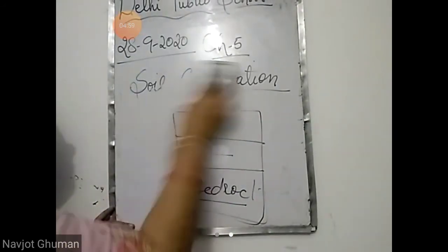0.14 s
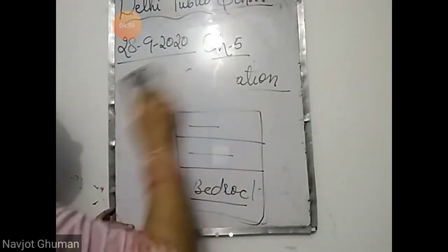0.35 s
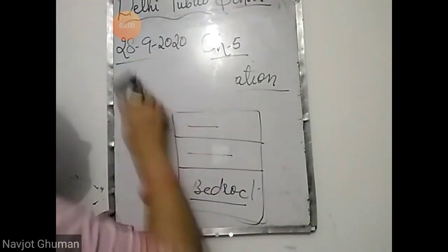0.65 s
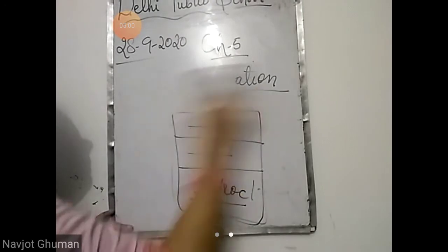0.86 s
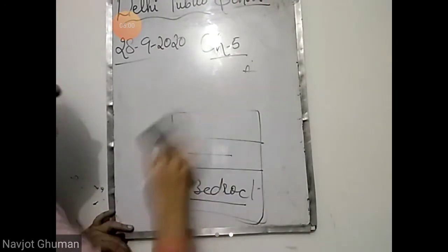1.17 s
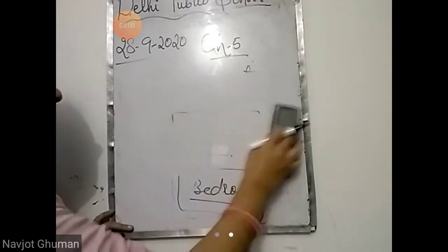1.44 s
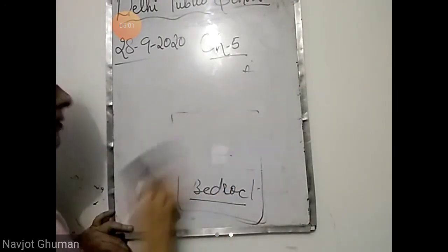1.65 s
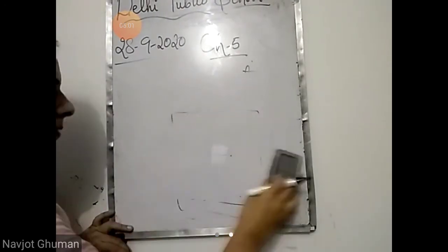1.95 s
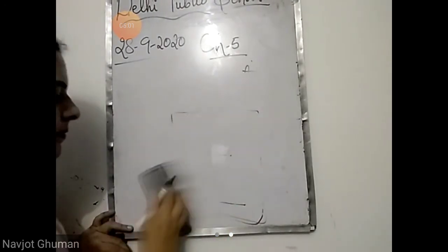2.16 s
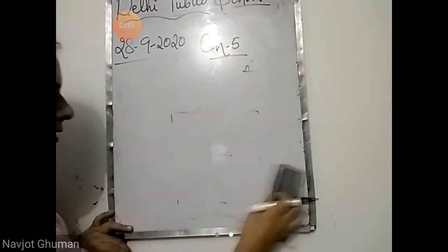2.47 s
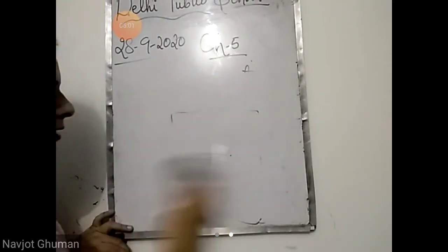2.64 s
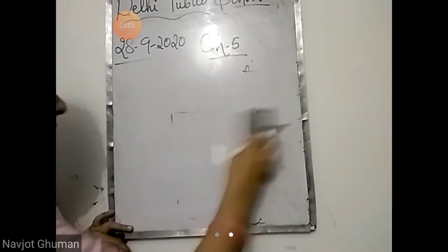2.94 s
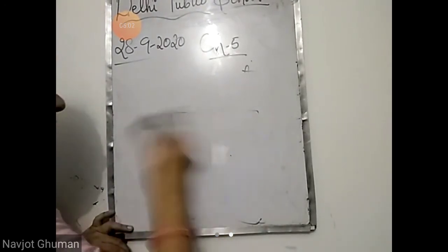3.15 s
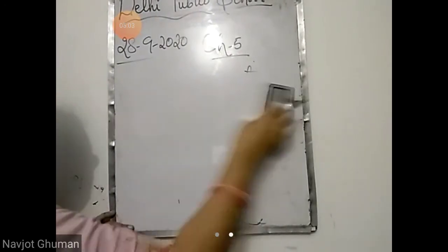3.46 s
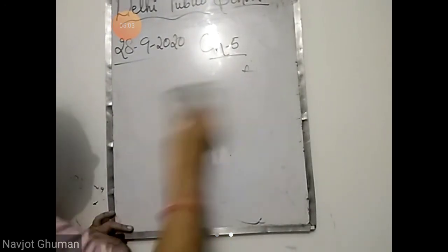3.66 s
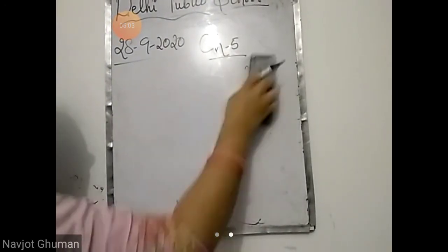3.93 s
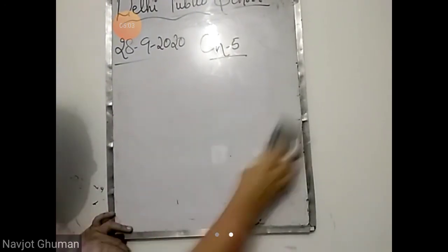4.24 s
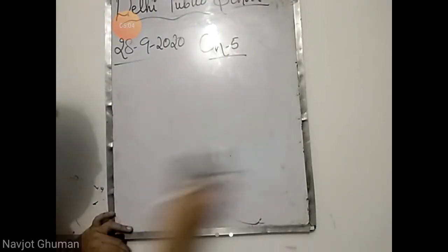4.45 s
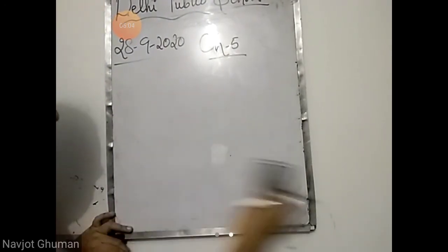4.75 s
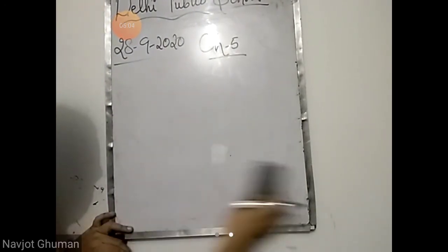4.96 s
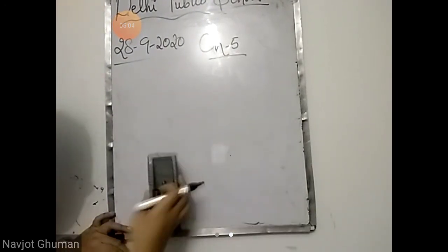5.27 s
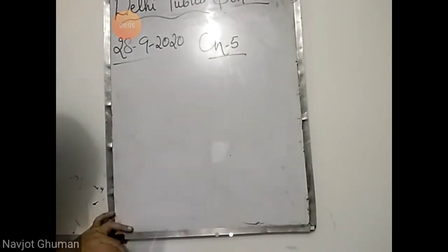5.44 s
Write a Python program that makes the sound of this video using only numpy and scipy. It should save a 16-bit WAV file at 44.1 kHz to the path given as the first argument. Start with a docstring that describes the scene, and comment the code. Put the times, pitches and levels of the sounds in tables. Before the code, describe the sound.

A felt duster with a plastic holder wipes a whiteboard in a small, quiet, fairly dead room, heard closely in mono over faint steady hiss. It opens mid-stroke with a raspy rub, quick low judders and a thin, faint squeak until about 0.5 s, where tiny bright ticks appear. A clear hollow knock lands at 0.65 s, then softer wipes follow around 1.0 and 1.2 s. From 1.5 s strokes come faster and scrape more coarsely, with clacks near 1.7 s. The strongest burst is at 2.15-2.35 s: sharp hiss, hard plastic clacks, hollow knocks and a dull board bump. More knocks and scrapes follow at 2.6 and 2.93 s. From 3.0 to 4.2 s it is sparse, with muted knocks and light rubs. Scratchy wipes return at 4.3 and 4.65 s, a fuller hissing stroke at 4.85-5.0 s, short rubs near 5.15 s, then near silence with one barely audible brush around 5.5 s.

```python
"""Felt hisses and rasps in strokes over a whiteboard, with knocks, judders and ticks, in a small quiet room.
Random fibre slips and a stuttering resonant scrape make the felt; its drag makes a low rumble and a hollow rub.
The pad's judders are short wavering tones. The plastic holder knocks in damped modes, chatters and clacks.
Small bright ticks, some very faint, are fast-decaying coloured noise; a thin squeak is a moving noise band."""
import sys
import numpy as np
from scipy import signal
from scipy.fft import rfft, irfft, next_fast_len
from scipy.io import wavfile
from scipy.ndimage import uniform_filter1d, map_coordinates

SR = 44100
rng = np.random.default_rng(int(sys.argv[2]) if len(sys.argv) > 2 else 0)


def digitize_waveform(pressure):
    """Quantize a signal to 16-bit integers and store it at the path in sys.argv[1].

    Rows of a 2-D input are taken as channels; values are limited to [-1, 1].
    """
    field = np.atleast_2d(pressure).T
    bounded = np.clip(field, -1, 1)
    quanta = np.round(bounded * 32767).astype(np.int16)
    wavfile.write(sys.argv[1], SR, quanta)


N = 246959

# Spectrum of the room tone. Each row: frequency in Hz, relative level in dB.
ROOM_TONE_SPECTRUM = [(25, -14), (60, -18), (150, -8), (330, -1), (700, -5), (1400, -10.5), (3000, -14),
                      (6000, -18), (9000, -21), (12000, -23.5), (16000, -30)]
# Decay of the room. Each row: frequency in Hz, t60 in seconds.
ROOM_DECAY = [(150, 0.29), (1000, 0.12), (4000, 0.067), (14000, 0.17)]
# Dull bumps of the board giving under the arm. Each row: time in seconds, envelope peak in dB, pitch in Hz.
BOARD_BUMPS = [(1.285, -51, 170), (1.48, -56, 149), (1.525, -57, 180), (1.622, -53.5, 120),
               (1.801, -54.5, 140), (1.831, -51, 120), (1.874, -53, 135), (1.967, -50, 130),
               (2.155, -55.5, 150), (2.305, -42, 150), (2.431, -56, 140), (2.991, -52, 135),
               (4.643, -63, 130)]
# Small bright ticks, some very faint. Each row: start in seconds, relative level in dB.
TICKS = [(0.396, -30), (0.4054, -43), (0.436, -32.5), (0.46, -44), (0.478, -35), (0.4868, -25),
         (1.208, -45.5), (2.789, -45), (3.16, -49), (3.79, -52), (4.008, -52.5), (5.32, -54), (5.46, -53)]
# Spectrum of the ticks. Each row: frequency in Hz, relative level in dB.
TICK_SPECTRUM = [(2000, -36), (4500, -12), (7300, 8.5), (8500, -0.5), (9800, 9), (11500, -2), (13500, 4),
                 (16000, -18)]
# Thin squeak of felt on dry ink. Each row: time in seconds, pitch in Hz, relative level in dB.
INK_SQUEAK = [(.05, 6080, -72), (.09, 6000, -56), (.12, 5750, -53), (.19, 5650, -53), (.22, 6000, -57),
              (.26, 5350, -56), (.29, 6500, -58), (.33, 6000, -65), (.36, 6350, -60), (.39, 5750, -60),
              (.46, 6400, -58), (.53, 6500, -72)]
# Hard edge of the holder clipping the board. Each row: start in seconds, peak in dB, pitch in Hz.
EDGE_CLACKS = [(.644, -31, 2300), (1.547, -39, 2000), (1.622, -38, 2700), (1.689, -27, 4200),
               (1.7196, -32, 3300), (2.2615, -19, 4600), (2.286, -21, 2800), (2.351, -28, 2600),
               (2.4335, -33, 2200), (2.6057, -24, 2200), (2.7692, -33, 2100), (2.9303, -21.5, 1600),
               (4.481, -43, 2900), (4.668, -32, 2400)]
# Nominal partials of a clack. Each entry: ratio to its pitch.
CLACK_PARTIAL_RATIOS = [.76, .9, 1.07, 1.3]
# Holder knocking on the board. Each row: time in seconds, relative strength in dB, most excited pitch in Hz,
# fall away from that pitch in dB per octave, relative crack level in dB.
HOLDER_KNOCKS = [(.018, -35, 1100, 28, -63), (.037, -42, 1100, 28, -65), (.088, -45, 750, 16, -75),
                 (.644, -33.5, 1800, 24, -42.5), (.649, -24, 1060, 48, -58), (.79, -47, 1990, 23, -68),
                 (.795, -41.5, 1190, 30, -68), (.914, -50, 1790, 18, -78), (.964, -38, 1800, 34, -56),
                 (1.173, -50, 2280, 30, -61), (1.178, -34.5, 1110, 38, -60), (1.319, -41, 1160, 35, -73),
                 (1.471, -46, 1600, 15, -55), (1.551, -41, 1450, 20, -60), (1.620, -39.5, 650, 8, -53),
                 (1.628, -36, 1100, 26, -54), (1.689, -56, 1500, 10, -46), (1.807, -44, 2200, 36, -60),
                 (1.943, -39, 1400, 17, -59), (2.149, -30.5, 1050, 28, -57), (2.165, -45, 990, 14, -64),
                 (2.196, -39.5, 890, 11, -40), (2.286, -28, 2330, 21, -29), (2.289, -25.5, 760, 13, -50),
                 (2.307, -34, 1400, 9, -46), (2.351, -35, 1900, 6, -36), (2.428, -43.5, 900, 8, -52),
                 (2.434, -35.5, 1310, 15, -45), (2.574, -38, 1700, 9, -49), (2.605, -42, 1300, 13, -44),
                 (2.707, -45.5, 1900, 16, -56), (2.77, -39.5, 1820, 18, -47), (2.93, -26, 600, 6, -45),
                 (2.944, -38, 1700, 14, -56), (3.012, -43, 1870, 15, -50.5), (3.176, -35, 715, 29, -64),
                 (3.221, -35, 1050, 18.5, -58), (3.442, -53.5, 1900, 20, -78), (3.5, -38, 1850, 36, -42),
                 (4.26, -54.5, 1100, 10, -79.5), (4.481, -58, 1300, 3, -51), (4.5, -55, 2200, 10, -56),
                 (4.54, -55, 1950, 28, -68), (4.656, -37, 2250, 40, -46), (5.243, -60.5, 2000, 22, -76),
                 (5.402, -57, 2200, 28, -68)]
# Modes that a knock rings. Each row: nominal frequency in Hz, t60 in seconds.
KNOCK_MODES = [(520, 0.036), (590, .06), (679, 0.057), (802, 0.053), (955, 0.028), (1102, 0.039),
               (1270, 0.028), (1410, 0.018), (1560, 0.028), (1790, 0.046), (1950, 0.048), (2230, 0.036),
               (2480, 0.012), (2760, .012)]
# Spectrum of the cracks. Each row: frequency in Hz, relative level in dB.
CRACK_SPECTRUM = [(1500, -15), (2800, 0), (3500, 1), (5200, -1.5), (7000, -10), (10000, -9), (16000, -23)]
# Stick-slip judders and scuffs of the pad. Each row: centre in seconds, relative level in dB,
# mean pitch in Hz, length at half amplitude in seconds.
PAD_JUDDERS = [(.008, -45, 1550, .022), (.028, -36, 1090, .022), (.042, -42, 414, .024),
               (0.103, -40, 358.5, .009), (.123, -46, 2750, .006), (.132, -39, 365, .016),
               (.161, -36, 370, .012), (.176, -48, 1130, .016), (.21, -45, 1132, .016),
               (.25, -54, 1080, .025), (.274, -49, 380, .014), (.398, -42.5, 256, .014),
               (.418, -42, 342, .013), (0.443, -45.5, 1024, 0.023), (.472, -46, 329, 0.013),
               (0.631, -57.5, 399, 0.01), (.662, -48, 850, .012), (.812, -58, 1180, 0.023),
               (.842, -59, 1600, .03), (0.862, -53, 350, .01), (.913, -47.5, 435, 0.014),
               (.937, -53, 450, 0.014), (1.005, -51, 520, 0.032), (1.044, -51, 390.4, .012),
               (1.08, -37, 604, 0.008), (1.101, -50.5, 600, .025), (1.13, -57, 1810, 0.027),
               (1.201, -55, 1400, 0.012), (1.232, -44, 411, .008), (1.255, -47.5, 326, .028),
               (1.255, -56, 1594, .04), (1.283, -41, 376, .013), (1.365, -45.5, 331, .022),
               (1.495, -50, 1700, .02), (1.592, -41.5, 414, 0.011), (1.625, -38.5, 680, .011),
               (1.643, -50, 699, .014), (1.644, -48.5, 223, .014), (1.7, -44, 580, .008),
               (1.724, -52, 800, 0.012), (1.809, -52, 780, .04), (1.88, -52.5, 414, .027),
               (1.899, -56, 720, 0.047), (1.93, -40.5, 436, 0.0077), (1.957, -52, 1250, .018),
               (1.99, -43, 300, 0.0074), (2.175, -44, 414, 0.038), (2.178, -45, 830, .02),
               (2.308, -31.5, 233, 0.011), (2.312, -36, 1100, 0.03), (2.3, -33, 600, .018),
               (2.325, -33, 699, .006), (2.36, -44, 560, .025), (2.384, -46, 850, .016),
               (2.431, -44.5, 212, 0.023), (2.447, -43.5, 1330, .018), (2.514, -37, 400, .006),
               (2.524, -35, 376, .008), (2.56, -41, 2250, .012), (2.582, -42.5, 296.3, .048),
               (2.628, -43, 370.3, .02), (2.675, -47.5, 401, 0.025), (2.73, -54, 1900, .02),
               (2.8, -52.5, 1080, .035), (2.877, -55, 800, .02), (2.889, -47.5, 393, .012),
               (2.911, -55, 1146, .02), (2.961, -37, 579, 0.012), (2.983, -45, 579, 0.016),
               (3.001, -47, 560, .008), (3.021, -44, 700, .009), (3.04, -49, 680, 0.016),
               (3.087, -43.5, 413.3, 0.027), (3.137, -57, 830, .015), (3.207, -52, 780, .015),
               (3.232, -43, 846, .013), (3.264, -41.5, 275, 0.033), (3.345, -49.5, 1151, 0.043),
               (3.404, -50, 256, .012), (3.551, -53.5, 977, .018), (3.782, -50, 476, 0.0079),
               (3.855, -64, 850, .012), (3.889, -55, 4600, .011), (3.945, -68, 1560, 0.027),
               (4.0, -59.5, 980, 0.013), (4.055, -59.5, 1380, .018), (4.062, -45, 413, 0.019),
               (4.125, -54.5, 1158, 0.016), (4.161, -60.5, 1540, .012), (4.212, -60, 210, .012),
               (4.283, -60, 700, 0.016), (4.33, -52, 2250, .022), (4.385, -52, 2200, .016),
               (4.43, -60, 720, .025), (4.484, -52, 421, .008), (4.568, -62, 1220, .016),
               (4.594, -62, 750, .012), (4.678, -51, 700, 0.013), (4.691, -46.5, 359, .007),
               (4.774, -51, 350, .009), (4.802, -54, 1130, .008), (4.824, -49, 376, .011),
               (4.888, -60, 780, .014), (4.918, -52, 1750, .03), (4.96, -43, 2300, .022),
               (5.048, -53, 667, 0.04), (5.051, -59.5, 1184, .008), (5.075, -56, 197, 0.023),
               (5.151, -54, 580, .012), (5.213, -54.5, 699, 0.026), (5.252, -57.5, 620, 0.021),
               (5.55, -70, 3100, .05), (5.57, -65, 4770, .03)]
# Resonances of the panel. Each row: frequency in Hz, relative width in Hz, relative level in dB.
PANEL_MODES = [(174, 58, -3.5), (236.4, 54, -1.5), (299.5, 46, 4), (357, 61, -2), (419, 50, 0.5),
               (491, 67, -2.5), (552, 81, -7)]
# Resonances of the hollow holder on the panel. Each row: frequency in Hz, relative width in Hz, relative level in dB.
HOLDER_MODES = [(676, 65, -0.5), (794, 71, 2), (947, 100, 8.5), (1126, 155, 9.5), (1236, 200, 1.5),
                (1512, 176, 8.5)]
# Centre of the scrape, drifting from stroke to stroke. Each row: time in seconds, frequency in Hz.
SCRAPE_CENTRE = [(.2, 1700), (.76, 1900), (1.1, 1750), (1.3, 1700), (1.6, 2000), (1.8, 2250), (2.03, 2250),
                 (2.6, 2300), (2.8, 2150), (3.27, 1850), (4.35, 2250), (4.67, 2290), (4.86, 2200),
                 (4.92, 2250), (5.0, 2500), (5.15, 2250)]
# Spectrum of the rasp. Each row: frequency in Hz, relative level in dB.
RASP_SPECTRUM = [(1900, -39.5), (2500, -5.5), (2800, 2.5), (3200, -1), (3700, 1.5), (4020, -7), (4300, 1.5),
                 (4700, -3), (5200, -7.5), (6500, -51)]
# Spectrum of the hiss. Each row: frequency in Hz, relative level in dB.
HISS_SPECTRUM = [(3800, -30.5), (4900, -4.5), (5500, -0.5), (6200, 0), (7000, -2), (8100, -5.5), (8900, -2),
                 (10000, -8.5), (11200, -5), (12300, -9), (13200, -7.5), (14500, -14.5), (15400, -18),
                 (16000, -25)]
# Strokes of the duster. Each row: start in seconds, rise in seconds, hold in seconds, fade in seconds per 20 dB,
# felt level in dB, hiss re felt in dB, scrape re felt in dB, panel rumble in dB, hollow rub in dB.
DUSTER_STROKES = [(0.0, 0.004, .026, 0.035, -51, -1.5, -4, -57, -48),
                  (0.07, .055, 0.083, 0.05, -55.5, 1, -7, -54, -60),
                  (0.223, 0.022, 0.093, 0.27, -70.5, 6, -2, -64, -79),
                  (0.379, 0.039, 0.08, .05, -71.5, 10, -1, -61.5, -68),
                  (0.662, 0.049, .11, 0.25, -69, -5.5, -1, -74, -74),
                  (0.97, 0.023, 0.059, 0.13, -72, -4, -4, -59, -65),
                  (1.019, .07, 0.036, 0.1, -56.5, 1, -5, -59, -61.5),
                  (1.218, 0.039, 0.074, .07, -58.5, -6, -0.5, -57.5, -63),
                  (1.47, 0.022, 0.072, 0.3, -66, -2, 3, -64, -62.5),
                  (1.547, 0.039, 0.055, 0.045, -58.5, -4, -1.5, -55, -65),
                  (1.686, 0.0046, 0.033, 0.055, -47, 4, -12, -70, -69),
                  (1.717, .002, .007, .008, -45, -2, -7, -70, -65),
                  (1.726, 0.027, 0.092, 0.04, -54.5, -10, 6.5, -60, -62),
                  (1.971, 0.045, 0.066, 0.06, -58.5, -4, 6, -64, -58.5),
                  (2.064, 0.0022, 0.02, .006, -49.5, 10.5, 5, -70, -62),
                  (2.142, 0.019, 0.024, 0.1, -63, -2, 3, -55, -58),
                  (2.173, 0.056, .015, 0.0466, -40, 4.5, -3, -58, -54),
                  (2.244, 0.021, 0.019, 0.05, -35.5, 2.5, -6, -52, -49),
                  (2.273, 0.019, 0.026, .085, -45, 0, 1.5, -46.5, -41),
                  (2.416, 0.012, 0.016, 0.06, -68, -4, 5, -56, -50),
                  (2.47, 0.02, 0.043, 0.05, -58, 1, -3, -54, -70),
                  (2.533, .018, .035, 0.0247, -47.5, 2.5, 3.5, -56.5, -50.5),
                  (2.603, .003, .022, 0.04, -48, 5, 1.5, -56, -50.5),
                  (2.721, 0.05, 0.037, 0.06, -59, -4.5, 5.5, -69, -61.5),
                  (2.923, 0.0087, 0.012, 0.05, -71.5, -7, 8, -57, -51.5),
                  (3, 0.0077, 0.023, 0.2, -71.5, 6.5, -7, -62.5, -65.5),
                  (3.196, 0.036, .12, 0.08, -66, 4.5, 4, -66, -69),
                  (3.494, 0.0083, .04, 0.17, -69.5, 8.5, -3, -77, -70),
                  (3.882, .003, .01, .015, -65, -7, -2, -80, -80),
                  (4.108, 0.017, 0.024, 0.15, -70.5, -4, -7, -72, -74),
                  (4.293, 0.05, 0.045, 0.06, -58, 2, 0.5, -76, -77),
                  (4.499, .03, 0.099, 0.46, -67.5, 1, 2.5, -74, -76),
                  (4.648, 0.0067, .025, 0.06, -52, 8, 9.5, -69, -69),
                  (4.759, 0.023, 0.011, 0, -61, 1, 2, -72, -76),
                  (4.835, .014, 0.1, .08, -50, 4.5, 4, -72, -71),
                  (4.9, .05, 0.061, 0.06, -45, 3.5, -6, -67.5, -76),
                  (5.03, .02, 0.063, .04, -67, 12, -6, -65, -76),
                  (5.103, .004, .008, .02, -56, 0, -5, -72, -78),
                  (5.133, 0.008, 0.028, 0.02, -52.5, 1.5, -2, -70, -73),
                  (5.48, .08, 0.03, .1, -70, -5, -12, -81, -76)]

TOP_HZ = 16200
SWELL_DB_PER_S = 12  # per second of hold: the longer the sweep, the faster the hand in its middle
BRAKING = 1.07  # over 1: the fade steepens as the hand comes to a stop
BITE_LOSS_DB_PER_S = 40  # the coarse scrape wears off as the pad gets gliding
DRAG_LEAD_S, DRAG_FADE_RATIO = 0.0048, 1.13  # the panel is loaded before the felt slides, and fades longer
LEANING_DB = -75  # rumble of the panel under the leaning hand
CONTACT_S, SOFTENING = 0.0014, 0.24  # base knock onset; the less it cracks, the longer the contact
RATTLE_DB, RATTLE_T60_S = -13.5, .07  # the holder chatters on after each blow
JUDDER_ROUGH_HZ = 2100  # faster slips are less regular; from this pitch on a mere scuff
SLIP_HZ, SLIP_DRIFT, SLIP_FALL_DB = 150, .25, 7  # uneven slip train; fall in dB over each slip


def amp(db):
    """Amplitude of a level in dB."""
    return 10 ** (np.asarray(db) / 20)


def unit(x):
    """x scaled to rms 1."""
    return x / np.sqrt(np.mean(x ** 2) + 1e-20)


def along(points, hz):
    """(Hz, value) points interpolated on a log frequency axis."""
    f, v = np.transpose(points)
    return np.interp(np.log(hz + 1), np.log(f + 1), v)


def curves(rows):
    """One value per sample for each column after the time."""
    s, *cols = np.transpose(rows)
    return [np.interp(np.arange(N) / SR, s, c) for c in cols]


def wobble(rate_hz, points_per_knot=8):
    """Smooth random curve through rate_hz knots a second."""
    knots = rng.standard_normal(int(N * rate_hz / SR) + 4)
    steps = np.arange(len(knots) * points_per_knot) / points_per_knot
    return np.interp(np.arange(N) * rate_hz / SR, steps, map_coordinates(knots, [steps]))


def filtered(x, response):
    """x times a response of frequency."""
    m = next_fast_len(N + SR // 2)
    return irfft(rfft(x, m) * response(np.fft.rfftfreq(m, 1 / SR)), m)[:N]


def coloured(x, points):
    """x through a causal, minimum-phase filter of unit energy with the given spectrum."""
    size = 4096
    cepstrum = irfft(np.log(amp(along(points, np.fft.rfftfreq(size, 1 / SR)))))
    cepstrum[1:size // 2] *= 2
    cepstrum[size // 2 + 1:] = 0
    kernel = irfft(np.exp(rfft(cepstrum)))
    return signal.fftconvolve(x, kernel / np.linalg.norm(kernel))[:N]


def add(track, s, sound):
    """Mix a short sound into the track at time s."""
    start = round(s * SR)
    sound = sound[max(-start, 0):]
    part = track[max(start, 0):][:len(sound)]
    part += sound[:len(part)]


def samples_at(seconds):
    """Sample indices of the times, kept inside the scene."""
    return np.clip((seconds * SR).astype(int), 0, N - 1)


def band(hz, width_hz):
    """Resonance kept ringing by random slips: narrow noise of rms 1 around a steady or moving pitch."""
    phase = 2 * np.pi * np.cumsum(hz * np.ones(N)) / SR
    return unit(wobble(width_hz) * np.sin(phase) + wobble(width_hz) * np.cos(phase))


def background():
    """Faint, steady room tone and microphone hiss."""
    return amp(-68.0) * unit(coloured(rng.standard_normal(N), ROOM_TONE_SPECTRUM))


def room(x):
    """The walls answer with a delayed noise tail whose decay time depends on frequency."""
    hz, t, z = signal.stft(rng.standard_normal(SR // 2), SR, nperseg=256)
    decay = amp(-60 * t / along(ROOM_DECAY, hz)[:, None])
    tail = signal.istft(z * decay, SR, nperseg=256)[1]
    tail = np.pad(tail, (round(0.0054 * SR), 0))
    return signal.fftconvolve(x, tail / np.linalg.norm(tail))[:N]


def bumps(rise_s=0.0072):
    """The hanging board sways, heavily damped, for a few cycles."""
    out, t = np.zeros(N), np.arange(SR // 8) / SR
    envelope = (t / rise_s * np.exp(1 - t / rise_s)) ** 2
    for s, db, hz in BOARD_BUMPS:
        add(out, s - rise_s, amp(db) * envelope * np.sin(2 * np.pi * hz * t))
    return out


def ticks(t60_s=0.019):
    """Small bright ticks, some very faint: fast-decaying coloured noise."""
    out, t = np.zeros(N), np.arange(SR // 20) / SR
    for s, db in TICKS:
        add(out, s, amp(db - 4.0 - 60 * t / t60_s) * rng.standard_normal(len(t)))
    return coloured(out, TICK_SPECTRUM)


def squeak(width_hz=330):
    """A narrow, wandering band of friction noise."""
    hz, db = curves(INK_SQUEAK)
    t = np.arange(N) / SR
    sounding = (t > INK_SQUEAK[0][0]) & (t < INK_SQUEAK[-1][0])
    return sounding * amp(db - 3 + 3.5 * wobble(70)) * band(hz, width_hz)


def clacks(spread=.03, t60_cycles=24):
    """Dry, point-like contacts: a cluster of partials that is gone within a few cycles."""
    out, t = np.zeros(N), np.arange(SR // 50) / SR
    for s, db, hz in EDGE_CLACKS:
        detune = np.exp(spread * rng.standard_normal(len(CLACK_PARTIAL_RATIOS)))
        partials_hz = hz * np.array(CLACK_PARTIAL_RATIOS) * detune
        envelope = (1 - np.exp(-t * hz)) * amp(-60 * t * hz / t60_cycles)
        wave = np.sin(2 * np.pi * partials_hz[:, None] * t).sum(0) * envelope
        add(out, s, amp(db) * wave / np.abs(wave).max())
    return out


def knocks(crack_t60_s=0.02, scatter_db=2.0, punch=0.94, punch_t60_s=0.031):
    """Each contact rings board and holder, then chatters briefly; felt softens the onset, bare plastic cracks."""
    ring, cracks, t = np.zeros(N), np.zeros(N), np.arange(-SR // 50, SR // 8) / SR
    hz, t60_s = np.transpose(KNOCK_MODES)
    since = np.maximum(t, 0)
    blow = 1 + punch * amp(-60 * since / punch_t60_s)  # the blow is louder than the ring that it leaves
    chatter = np.array([band(f, width_hz=380) for f in hz]) * unit(amp(4 * wobble(240)))
    for s, db, centre_hz, fall_db, crack_db in HOLDER_KNOCKS:
        contact_s = CONTACT_S * amp(SOFTENING * (db - crack_db))
        onset = (1 + np.tanh(t / contact_s)) / 2
        force_db = db - fall_db * np.abs(np.log2(hz / centre_hz))
        strength, detune, phase = rng.standard_normal((3, len(hz), 1))  # the point of contact differs every time
        modes = np.sin(2 * np.pi * (hz[:, None] * (1 + 0.036 * detune) * t + phase))
        modes = modes * amp(force_db[:, None] + scatter_db * strength - 60 * since / t60_s[:, None])
        rattle = amp(force_db) @ chatter[:, samples_at(s + t)] * amp(RATTLE_DB - 60 * since / RATTLE_T60_S)
        crack = amp(crack_db + 6 - 60 * since / crack_t60_s) * rng.standard_normal(len(t))
        add(ring, s + t[0], onset * (amp(-7.0) * blow * modes.sum(0) + rattle))
        add(cracks, s + t[0], onset * crack)
    return ring + coloured(cracks, CRACK_SPECTRUM)


def judders(waver=0.0482, rough_db=2.5, scuff_hz=300):
    """The pad sticks and slips for a few cycles, swelling and fading: slow slips almost regular, fast ones ragged."""
    out, t = np.zeros(N), np.arange(-SR // 14, SR // 14) / SR
    drift, grip = wobble(160), wobble(200)
    ragged = unit(wobble(scuff_hz)) + 1j * unit(wobble(scuff_hz))
    for s, db, hz, length_s in PAD_JUDDERS:
        now = samples_at(s + t)
        phase = 2 * np.pi * (np.cumsum(hz * (1 + waver * drift[now])) / SR + rng.random())
        swell = .5 ** ((2 * t / length_s) ** 2)
        ragged_share = min(hz / JUDDER_ROUGH_HZ, 1) ** 2
        regularity = np.sqrt(1 - ragged_share) + np.sqrt(ragged_share / 2) * ragged[now]
        wave = np.imag(np.exp(1j * phase) * regularity)
        add(out, s + t[0], amp(db + rough_db * grip[now] - 1.0) * swell * wave)
    return out


def sweep(age, rise, hold, fade):
    """Gain of one stroke: the hand speeds up, sweeps fastest in the middle and slows to the turn."""
    middle = np.sin(np.pi * np.clip((age - rise) / hold, 0, 1))
    slowing = np.clip((age - rise - hold) / fade, 0, 10)
    return np.clip(age / rise, 0, 1) * amp(SWELL_DB_PER_S * hold * middle - 20 * slowing ** BRAKING)


def strokes():
    """Gains of scrape, rasp, hiss, panel rumble and hollow rub from shared sweeps, summed as power."""
    scrape, rasp, hiss, rumble, rub = np.zeros((5, N))
    t = np.arange(SR * 2 // 3) / SR
    for s, rise, hold, fade, db, bright_db, bite_db, rumble_db, rub_db in DUSTER_STROKES:
        sliding = amp(db) * sweep(t, rise, hold, fade)
        load = sweep(t, rise, hold + DRAG_LEAD_S, fade * DRAG_FADE_RATIO)
        add(scrape, s, (sliding * amp(bite_db - BITE_LOSS_DB_PER_S * t)) ** 2)
        add(rasp, s, sliding ** 2)
        add(hiss, s, (sliding * amp(bright_db)) ** 2)
        add(rumble, s - DRAG_LEAD_S, (load * amp(rumble_db)) ** 2)
        add(rub, s - DRAG_LEAD_S, (load * amp(rub_db)) ** 2)
    return np.sqrt([scrape, rasp, hiss, rumble, rub])


def slips(rate_hz, spread_db):
    """Tiny releases at random times and of uneven size; rms 1."""
    releases = rng.random(N) < rate_hz / SR
    return unit(releases * rng.standard_normal(N) * amp(spread_db * rng.standard_normal(N)))


def rubbed(modes, patchy_db):
    """As the pad travels it drives now one mode, now another; rms 1."""
    return unit(sum(band(hz, 1.8 * width) * amp(db + patchy_db * wobble(32)) for hz, width, db in modes))


def jolted(kicks, modes, patchy_db):
    """Every kick rings all modes briefly; their balance shifts as the pad travels; rms 1."""
    out = np.zeros(N)
    for hz, width, db in modes:
        b, a = signal.iirpeak(hz, hz / (2 * width), SR)
        once = signal.lfilter(b, a, kicks)
        out += unit(signal.lfilter(b, a, once)) * amp(db + patchy_db * wobble(32))
    return unit(out)


def drag(rumble_gain, rub_gain):
    """Coarser slips of the whole pad shake the panel and, as separate grains of grit, the hollow holder."""
    panel = rubbed(PANEL_MODES, patchy_db=7.0) * np.hypot(rumble_gain, amp(LEANING_DB))
    grit = slips(rate_hz=450, spread_db=1.0)
    return panel + jolted(grit, HOLDER_MODES, patchy_db=3.5) * rub_gain


def stutter():
    """Gain of the pad's stick-slip: each release starts sharply and fades until the next."""
    phase = np.cumsum(SLIP_HZ * np.exp(SLIP_DRIFT * wobble(70))) / SR
    return uniform_filter1d(amp(-SLIP_FALL_DB * (phase % 1)), size=40)


def travelling(x, patchy_db):
    """Each spot of the board favours other frequencies, so the colour shifts as the pad moves."""
    z = signal.stft(x, nperseg=256)[2]
    across_hz = uniform_filter1d(rng.standard_normal(z.shape), size=3, axis=0)
    field = uniform_filter1d(across_hz, size=16, axis=1)
    return signal.istft(z * amp(patchy_db * unit(field)), nperseg=256)[1][:N]


def felt(scrape_gain, rasp_gain, hiss_gain, coarse_db=2.5):
    """Many fibres catch and let go under trembling pressure; the scrape comes in coarse grains."""
    pressure_db = .8 * wobble(45) + 1.0 * wobble(260)
    pitch_hz, = curves(SCRAPE_CENTRE)
    slipping = stutter()
    resonance = band(pitch_hz, width_hz=520) + .3 * band(pitch_hz, width_hz=1300)
    scrape = unit(resonance * slipping * amp(coarse_db * wobble(280))) * scrape_gain
    rasp_slips = slips(rate_hz=5000, spread_db=0.5) * np.sqrt(slipping)
    rasp = unit(coloured(rasp_slips, RASP_SPECTRUM)) * rasp_gain
    hiss = unit(coloured(slips(rate_hz=22000, spread_db=3.5), HISS_SPECTRUM)) * hiss_gain
    return travelling((scrape + rasp + hiss) * amp(pressure_db), patchy_db=1.83)


def scene():
    """All contact sounds, direct and through the room, over the background."""
    scrape, rasp, hiss, rumble, rub = strokes()
    wiping = felt(scrape, rasp, hiss) + drag(rumble, rub)
    wiping += judders() + knocks() + clacks() + bumps() + ticks() + squeak()
    return (wiping + amp(-15) * room(wiping) + background())[None]


def record(dry):
    """Band limit: nothing is kept from TOP_HZ up."""
    return np.array([filtered(channel, lambda hz: hz < TOP_HZ) for channel in dry])


dry = scene()
out = record(dry)
digitize_waveform(out)
```